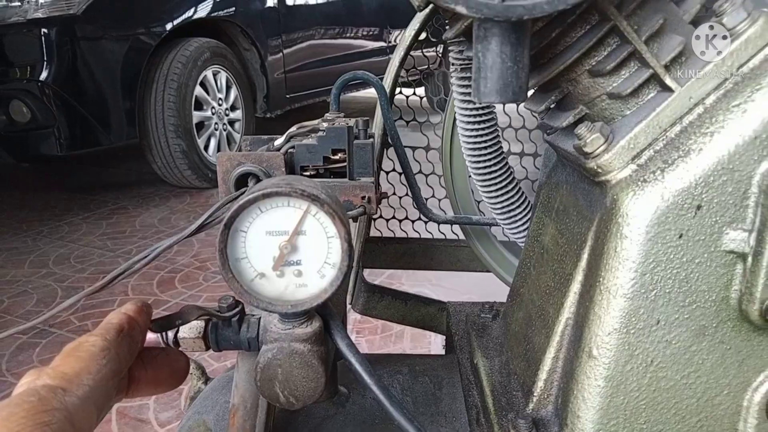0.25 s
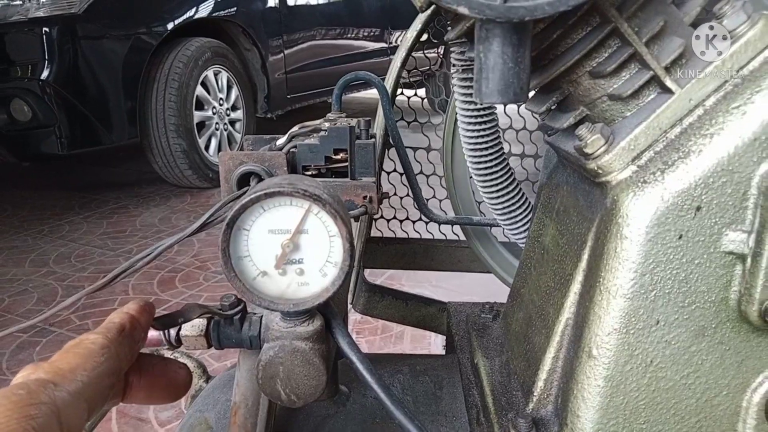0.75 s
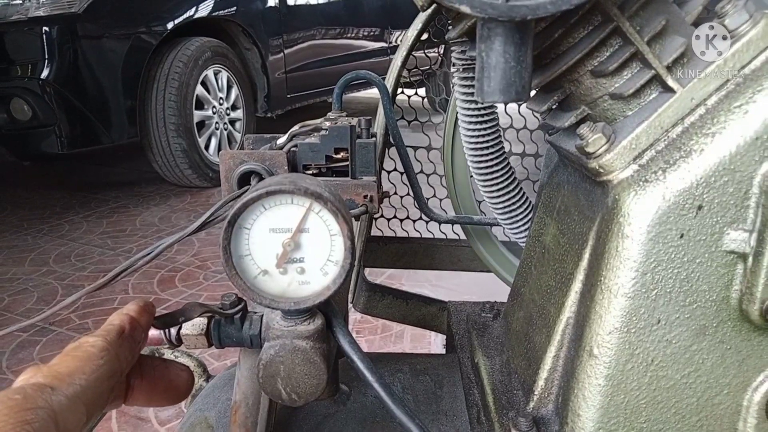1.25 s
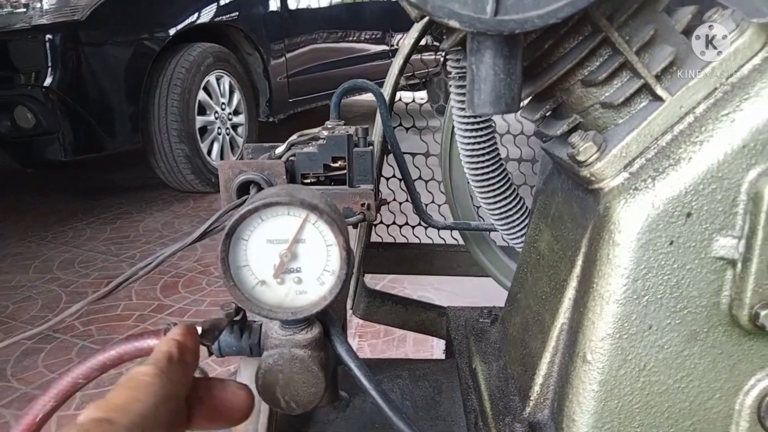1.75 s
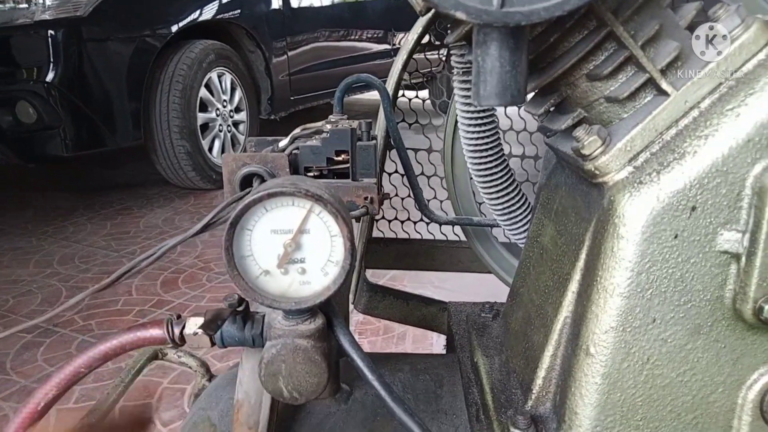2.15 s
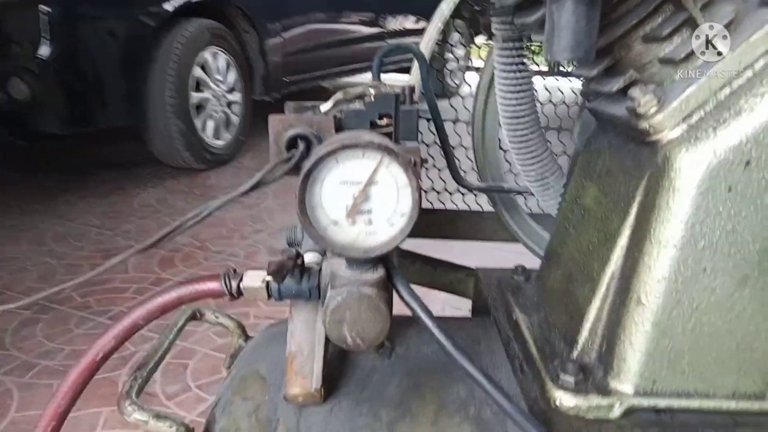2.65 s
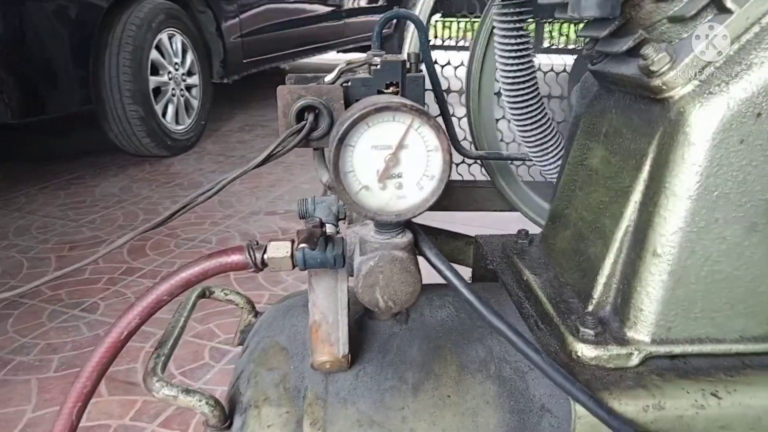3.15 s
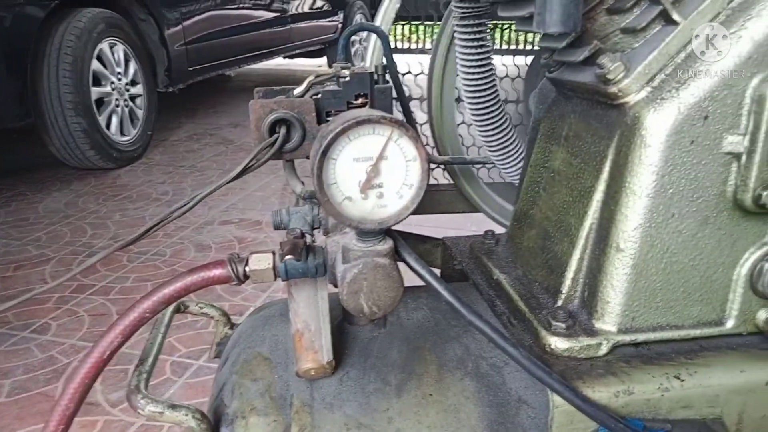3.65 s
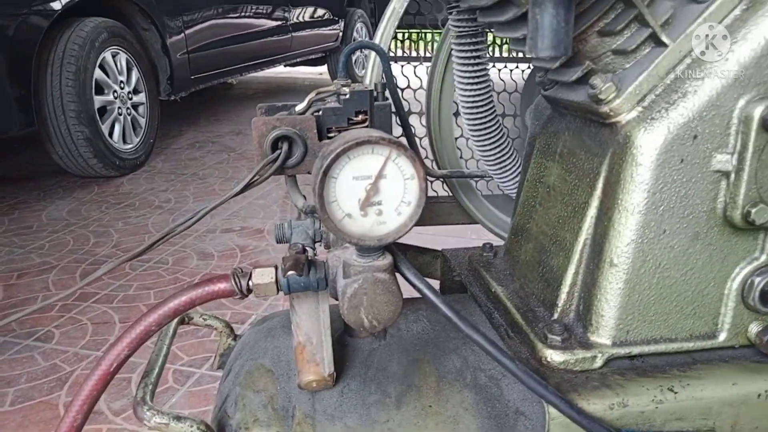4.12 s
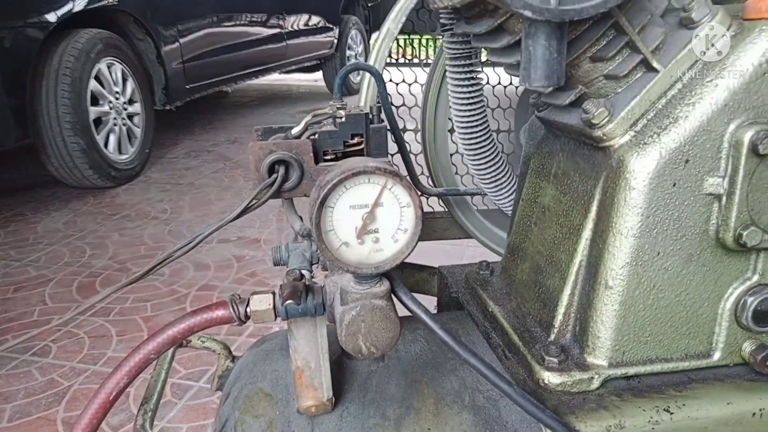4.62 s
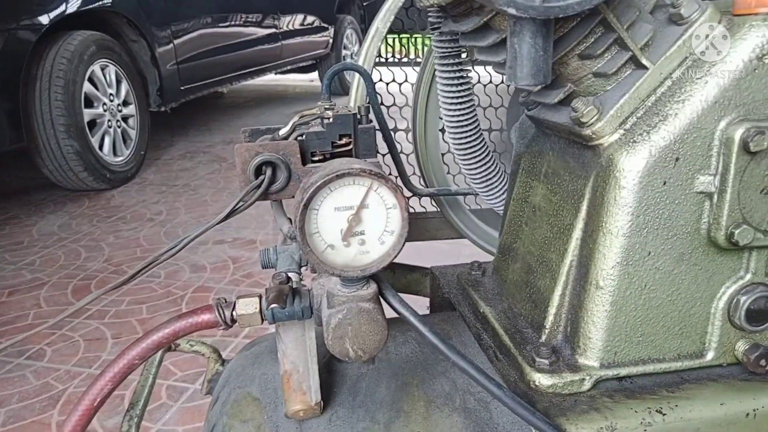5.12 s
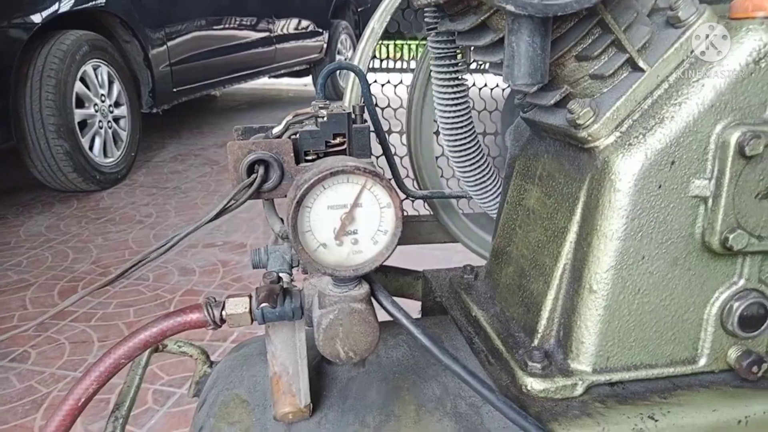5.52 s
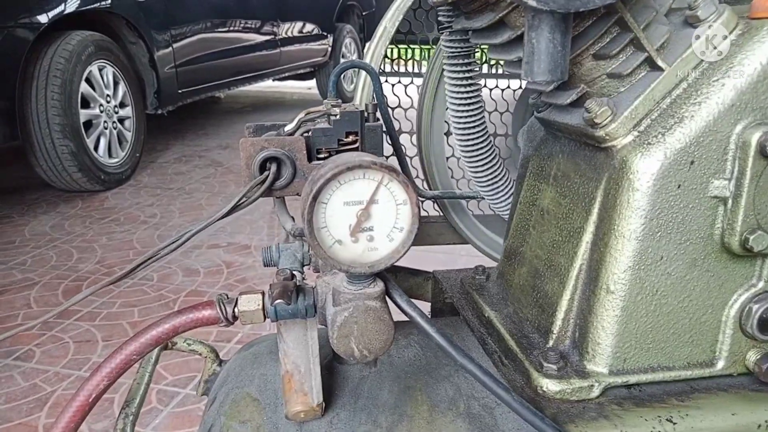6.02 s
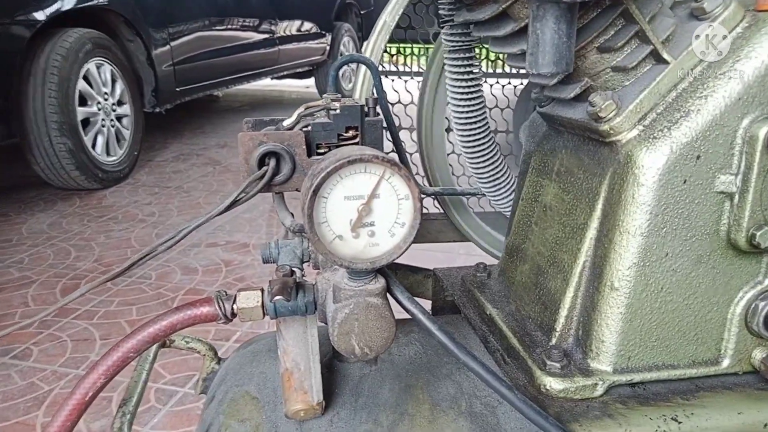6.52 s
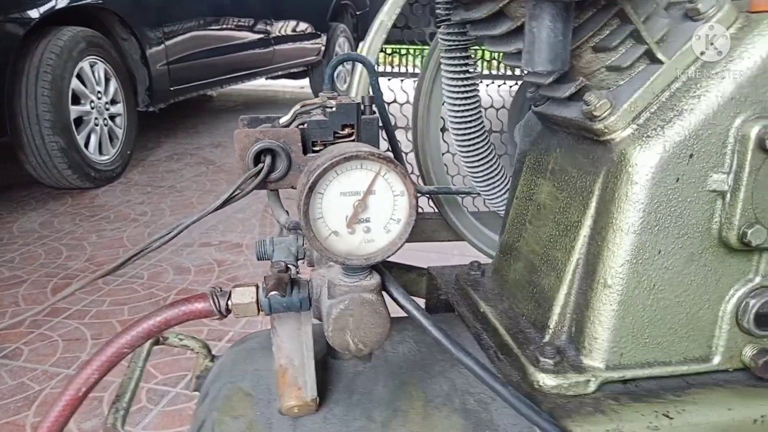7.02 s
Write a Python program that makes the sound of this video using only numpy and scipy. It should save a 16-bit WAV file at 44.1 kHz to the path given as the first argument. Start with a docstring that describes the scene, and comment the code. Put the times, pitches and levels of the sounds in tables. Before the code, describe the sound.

A worn piston compressor runs evenly up close in a hard-floored garage, about six crank turns a second. Each turn gives a low double honk of intake air, clacking metallic valves and rushing air, with irregular high dry squeaks over dense iron clatter and motor hum. Air hisses from an outlet until a tap closes before two seconds; afterwards low wind puffs buffet the microphone.

```python
"""An old belt-driven piston air compressor fills its tank in a garage.
On every crank turn, gulps of air make the intake pipe honk, mainly twice; valve plates ring and air rushes
through the head, made from gliding tones and shaped noise. A dry part squeaks in short gritty glides.
Below run iron clatter (noise and random ticks), steady motor tones and a wavering hum.
The flywheel blows low, lumpy noise at the microphone; an outlet hisses until its tap is shut."""
import sys
import numpy as np
from scipy import signal
from scipy.fft import rfft, irfft, next_fast_len
from scipy.io import wavfile
from scipy.ndimage import uniform_filter1d

SR = 44100
rng = np.random.default_rng(int(sys.argv[2]) if len(sys.argv) > 2 else 0)


def to_wav(s):
    """Save 16-bit WAV."""
    ch = np.atleast_2d(s).T  # columns
    pcm = np.round(np.clip(ch, -1, 1) * 32767)  # PCM
    wavfile.write(sys.argv[1], SR, pcm.astype(np.int16))


N = 320607
TIME = np.arange(N) / SR
HZ = np.fft.rfftfreq(N, 1 / SR)
TURN_S, FIRST_TURN_S = 0.16396, 0.0558  # length of one crank turn, and when the first one begins
TURNS = FIRST_TURN_S + TURN_S * np.arange(-1, 45)

# Gulps of air in the intake pipe on each turn.
# Each row: start in seconds into the turn, level in dB, hold in seconds, release in seconds, starting pitch in Hz.
GULPS = [(.0057, -18.5, .0053, .019, 268.5), (0.0429, -19, 0.0116, 0.0042, 245),
         (0.0552, -18.5, .029, .0035, 263), (0.0962, -29.5, 0.011, 0.01, 253.8)]
GULP_ATTACK_S, GULP_SAG_HZ_PER_S, PIPE_LOWEST_HZ = 0.0059, 940, 212  # each honk sags as the suction eases


def intake(clock, unsteady_cycles=0.023, unsteady_db=0.8, octave_db=-21.0,
           drone_db=-36, drone_hz=238, drone_width_hz=26):
    """Each gulp of air sets the intake pipe honking at a sagging pitch, over a faint steady drone."""
    slip = unsteady_cycles * wander(per_s=65)
    honks = np.zeros(N)
    for s, db, hold_s, release_s, hz in GULPS:
        age, swell = gulp(clock, s, hold_s, release_s)
        # The pitch stops sagging once it reaches the lowest note of the pipe.
        sagging = np.minimum(age, (hz - PIPE_LOWEST_HZ) / GULP_SAG_HZ_PER_S)
        cycles = hz * age - GULP_SAG_HZ_PER_S * sagging * (age - sagging / 2) + slip
        phase = 2 * np.pi * cycles
        honks += gain_of(db) * swell * (np.sin(phase) + gain_of(octave_db) * np.sin(2 * phase))
    drone = coloured(rng.standard_normal(N), resonances([(drone_hz, drone_width_hz, 0)]))
    unsteady = gain_of(unsteady_db * wander(per_s=40))
    return np.sqrt(2) * unsteady * honks + gain_of(drone_db) * drone


def gulp(clock, s, hold_s, release_s):
    """A gulp that comes once a turn: the time since it began, and its attack, hold and release."""
    age = (clock - FIRST_TURN_S - s) % TURN_S
    attack = np.minimum(age / GULP_ATTACK_S, 1)
    return age, attack * np.exp(-np.maximum(age - hold_s, 0) / release_s)


# Resonances of the intake filter housing.
# Each row: pitch in Hz, half width in Hz, relative level in dB.
THROAT = [(326, 215, -7), (535, 35.4, 3), (630, 55, -9)]
# Low push of each valve action.
# Each row: time in seconds into the turn, middle level in dB before the bass cut, half length in seconds.
THUMPS = [(.0115, -23, 0.0013), (0.049, -21, 0.0011), (0.101, -28.5, 0.0019)]


def suction(clock, gasp_db=-34.5, follows=0.45, idle_db=-41, lead_s=0.0062, bass_edge_hz=62):
    """Turbulence in the filter housing swells with each gulp; every valve action gives a low push."""
    flow = gain_of(idle_db)
    for s, db, hold_s, release_s, hz in GULPS:
        age, swell = gulp(clock + lead_s, s, hold_s, release_s)
        flow = flow + gain_of(db) * swell
    gasp = gain_of(gasp_db) * coloured(rng.standard_normal(N) * flow ** follows, resonances(THROAT))
    t = np.arange(-900, 900) / SR
    pushes = np.zeros(N)
    for start in TURNS:
        for s, db, half_s in THUMPS:
            late, loud = rng.uniform(-1, 1, 2)
            push = -t / half_s * np.exp(0.5 - 0.5 * (t / half_s) ** 2)  # one swing up, one swing down
            add(pushes, start + s + 0.0021 * late, gain_of(db + 6.8 * loud) * push)
    bass_cut = signal.butter(3, bass_edge_hz, "high", fs=SR, output="sos")
    return gasp + signal.sosfilt(bass_cut, pushes)


CLACK_AT_S, CLACK_JITTER_S, CLACK_SPREAD_DB = 0.0080, 0.00059, 0.2  # the main valve opens here in every turn
# How hard the main valve opens. Each row: time in seconds, middle level in dB.
CLACK_DB = [(0, -18), (1.4, -16), (3.3, -18), (3.75, -23.5), (4.8, -17.5), (7.27, -18.5)]
# Lesser valve flutters in each turn.
# Each row: time in seconds into the turn, middle pitch in Hz, middle level in dB, half length in seconds.
VALVE = [(.004, 1550, -38, 0.0013), (0.025, 1345, -21.5, .0026), (.128, 1332, -22.5, .0038),
         (.153, 1345, -27.5, .0065)]
# Valve chatter over one turn. Each row: time in seconds into the turn, relative level in dB.
CHATTER = [(0, 9.5), (.025, 3.5), (.05, 8), (.06, -1), (.085, 1.5), (.12, 4), (.127, 7), (.14, 4),
           (.152, 4)]
# Resonances of the valve chest. Each row: pitch in Hz, half width in Hz, relative level in dB.
PLATES = [(1280, 70, -15.5), (1307, 34, 10), (1430, 100, -58), (1560, 310, -2), (1610, 94, 0.5)]


def valves(clock, plate_hz=1346, clack_half_s=0.0062, chatter_db=-29.0, spread_db=1.8):
    """Valve plates flutter as they open and keep chattering in the valve chest."""
    out = np.zeros(N)
    for start in TURNS:
        late, loud, sharp = rng.standard_normal(3)
        swell, phase = flutter(plate_hz * (1 + 0.007 * sharp), clack_half_s, glide=0.0063, rough=0.021)
        db = curve(CLACK_DB, start) + CLACK_SPREAD_DB * loud
        add(out, start + CLACK_AT_S + CLACK_JITTER_S * late, gain_of(db) * swell * np.sin(phase))
        for s, hz, db, half_s in VALVE:
            late, loud, sharp = rng.standard_normal(3)
            swell, phase = flutter(hz * (1 + 0.012 * sharp), half_s, glide=0.003, rough=0.022)
            add(out, start + s + 0.000572 * late, gain_of(db + spread_db * loud) * swell * np.sin(phase))
    rattle = rng.standard_normal(N) * gain_of(each_turn(CHATTER, clock))
    return out + gain_of(chatter_db) * coloured(rattle, resonances(PLATES))


# Air rushing through the head over one turn. Each row: time in seconds into the turn, relative level in dB.
FLOW = [(0, -15), (.014, 2), (.04, 1), (.058, 6.5), (.078, 1), (.09, 6.5), (.108, 1), (.135, 2), (.16, 4)]
# Resonances of the air passages. Each row: pitch in Hz, half width in Hz, relative level in dB.
HEAD = [(829.4, 17, 5), (872.6, 37.4, 4), (920, 65, -6.5)]


def head(clock, rush_db=-28.5):
    """Air surges through the passages of the cylinder head, which colour its noise."""
    surges = rng.standard_normal(N) * gain_of(each_turn(FLOW, clock))
    return gain_of(rush_db) * coloured(surges, resonances(HEAD))


# The loud squeaks, when the dry part grips hard.
# Each row: time in seconds, pitch in Hz, level in dB, octave level in dB, half length in seconds,
# glide below (and before that above) the pitch as a share of it.
SQUEAKS = [(0.187, 2850, -16, -34, .0065, .005), (0.677, 3530, -21.5, -29.5, 0.0074, .045),
           (.846, 3440, -19, -31, 0.004, 0.017), (1.18, 3700, -16, -20.5, 0.0044, 0.0089),
           (1.339, 3540, -23, -31, 0.007, 0.022), (1.493, 3900, -23.5, -33, 0.003, .04),
           (1.705, 3540, -25.5, -45, 0.0043, 0.033), (1.988, 3850, -27, -23, 0.0029, 0.049),
           (2.198, 3470, -15.5, -30.5, .0053, -0.011), (2.485, 2890, -15.5, -31, 0.0058, 0.027),
           (2.64, 3600, -23.5, -45, 0.0032, .03), (2.973, 3580, -23.5, -25.5, .0054, 0.095),
           (3.142, 3430, -20.5, -33, 0.0084, 0.0086), (3.474, 3660, -18, -23, 0.0047, -0.04),
           (3.637, 3440, -19, -28.5, 0.0038, 0.026), (3.792, 3780, -21, -36.5, 0.0025, .03),
           (4.494, 3488, -19, -33, 0.0046, 0.048), (4.785, 3040, -23.5, -41, 0.0065, .07),
           (4.937, 3510, -22, -45, 0.0032, .02), (5.27, 3600, -21.5, -25.5, 0.0062, .11),
           (5.434, 3400, -19.5, -31.5, 0.0038, 0.023), (5.772, 3566, -21, -26, 0.0066, .005),
           (5.934, 3410, -24.5, -36, 0.0085, 0.027), (6.294, 3530, -24, -45, 0.0028, 0.028),
           (6.789, 3450, -21, -36.5, .0023, 0.014)]
# The faint chirp of a turn: seconds into the turn, then middle values for pitch, levels and half length.
SLIP_AT_S, SLIP_HZ, SLIP_DB, SLIP_OCTAVE_DB, SLIP_HALF_S = 0.131, 3914, -31, -41, 0.0027


def squeaks(pitch_spread=0.049, spread_db=7.5, jitter_s=0.0033):
    """The dry part squeaks loudly on some turns and chirps faintly where no loud squeak is close."""
    out = np.zeros(N)
    for s, *shape in SQUEAKS:
        add(out, s, squeak(*shape))
    for s in TURNS + SLIP_AT_S:
        late, loud, bright, sharp = rng.uniform(-1, 1, 4)
        chirp = squeak(SLIP_HZ * (1 + pitch_spread * sharp), SLIP_DB + spread_db * loud,
                       SLIP_OCTAVE_DB + spread_db * bright, SLIP_HALF_S, fall=0.0378)
        if all(abs(row[0] - s) > TURN_S / 10 for row in SQUEAKS):
            add(out, s + jitter_s * late, chirp)
    return out


def squeak(hz, db, octave_db, half_s, fall, third_db=-18, fourth_db=-27):
    """Dry metal sticks and slips: a short gritty glide with overtones."""
    swell, phase = flutter(hz, half_s, glide=fall, rough=0.017)
    grit = gain_of(0.76 * evened(uniform_filter1d(rng.standard_normal(len(swell)), size=40)))
    overtones = np.sin(2 * phase)
    overtones += gain_of(third_db) * np.sin(3 * phase)  # third and fourth are relative to the octave
    overtones += gain_of(fourth_db) * np.sin(4 * phase)
    return swell * grit * (gain_of(db) * np.sin(phase) + gain_of(octave_db) * overtones)


# Piston and valve scrapes in each turn.
# Each row: time in seconds into the turn, middle pitch in Hz, middle level in dB, half length in seconds.
SCRAPES = [(.011, 3560, -39, .003), (.053, 3950, -36.5, 0.0047), (0.141, 4000, -44, .003)]


def scrapes(octave_db=-3, spread_db=7):
    """Faint scrapes on each turn, too uneven to hold a pitch."""
    out = np.zeros(N)
    for start in TURNS:
        for s, hz, db, half_s in SCRAPES:
            late, loud, sharp = rng.uniform(-1, 1, 3)
            swell, phase = flutter(hz * (1 + 0.0399 * sharp), half_s, glide=0.0203, rough=0.038)
            stray = uniform_filter1d(0.15 * rng.standard_normal(len(phase)), size=24)
            phase = phase + np.cumsum(stray)
            tone = np.sin(phase) + gain_of(octave_db) * np.sin(2 * phase)
            add(out, start + s + 0.002 * late, gain_of(db + spread_db * loud) * swell * tone)
    return out


def ringing(x, hz=3450, width_hz=300, t60=0.16):
    """The iron picks up a squeak through one resonance, used twice, and rings on as dying reflections."""
    b, a = signal.iirpeak(hz, hz / width_hz, fs=SR)
    picked_up = signal.lfilter(b, a, signal.lfilter(b, a, x))
    return garage(picked_up, t60)


# Broad sound of the running iron. Each row: frequency in Hz, relative level in dB per Hz.
IRON = [(40, -38), (200, 9), (340, -3.5), (440, -8.5), (700, -2), (1120, -4.5), (1850, -6), (2400, 2.5),
        (3450, -5.5), (4000, -13.5), (4900, -10.5), (6400, -21), (7200, -18), (8400, -14), (10500, -29.5),
        (12500, -36), (13800, -29), (15500, -29)]
# Resonances and dips of the casting, tank and guard. Each row: pitch in Hz, full width in Hz, lift in dB.
CASTING = [(545, 133, 8), (1026, 58, 4.5), (1810, 190, -3.5), (1653, 32, 14), (1700, 28, -3.5),
           (1983, 96, 6.5), (2187, 98, 10), (2346, 50, 3), (2708, 31, 9), (2820, 76, 2.5), (3010, 94, -2.5),
           (3130, 36, 8), (3240, 24, 6.5), (3384, 130, 6), (4170, 400, 4.5), (4427, 89, 11.5),
           (4696, 130, 9), (4960, 100, 5), (5220, 40, 8.5), (9520, 160, 6)]
# The microphone draws back from the cylinder head. Each row: time in seconds, closeness from 0 to 1.
BESIDE_HEAD = [(2.5, 1), (3.0, 0.18)]
# Cooling fins, heard mostly from close by. Each row: pitch in Hz, half width in Hz, relative level in dB.
FINS = [(1546, 49, 8), (2570, 57, -23), (2820, 23, -9), (3200, 51, 3), (3780, 10, -25), (4770, 54, -6.5)]


def iron(clatter_db=-25.5, ticks_per_s=2500, tick_db=-4, ripple_db=1.0, fins_db=-32):
    """A dense rattle of small impacts and fan noise sounds through the casting and its cooling fins."""
    ticks = (rng.random(N) < ticks_per_s / SR) * rng.uniform(-0.9, 1, N)
    drive = rng.standard_normal(N) + gain_of(tick_db) * evened(ticks)
    # Countless small modes make the treble spectrum uneven.
    crowded = np.interp(HZ, np.arange(400) * 70, rng.standard_normal(400)) * (HZ > 5300)
    casting = coloured(drive, gain_of(read(IRON) + lift(CASTING) + ripple_db * crowded))
    fins = curve(BESIDE_HEAD, TIME) * coloured(rng.standard_normal(N), resonances(FINS))
    return gain_of(clatter_db + 0.89 * wander(per_s=180)) * casting + gain_of(fins_db) * fins


# Tones of the motor and its fan.
# Each row: pitch in Hz, middle level in dB, share of the crank's speed swing that the tone follows.
WHINE = [(359.7, -48, 0), (737.8, -52, .4), (883.9, -44, .5), (1015.8, -40, 1), (1135.5, -54, .5)]


def motor(swing=0.0037):
    """Most motor tones sag, mainly twice a turn, as the pistons load the belt."""
    angle = 2 * np.pi * TIME / TURN_S
    speed = swing * (2 * np.sin(angle) + 5 * np.sin(2 * angle + 1))
    out = np.zeros(N)
    for hz, db, follows in WHINE:
        pitch = hz * (1 + follows * speed + 0.00055 * wander(per_s=4.59))
        tone = np.sqrt(2) * np.sin(2 * np.pi * np.cumsum(pitch) / SR)
        out += gain_of(db + 2 * wander(per_s=3.13)) * tone
    return out


# A hum that swells and fades. Each row: time in seconds, middle level in dB.
HUM_DB = [(0, -43), (1.1, -41), (1.5, -46), (3.1, -41.5), (5.15, -46.5), (5.35, -34), (5.6, -43),
          (7.27, -48.5)]


def hum(hz=393.7, swell_db=2.5):
    """A tone of wavering pitch and level comes and goes under the clatter."""
    pitch = hz * (1 + 0.00303 * wander(per_s=10))
    level_db = curve(HUM_DB, TIME) + swell_db * wander(per_s=6)
    return gain_of(level_db) * np.sqrt(2) * np.sin(2 * np.pi * np.cumsum(pitch) / SR)


# Strength of the flywheel draught. Each row: time in seconds, middle level in dB.
DRAUGHT_DB = [(0, -28.5), (.5, -30.5), (1.2, -38.5), (2.7, -35), (3.05, -31), (4.1, -31), (4.9, -34),
              (6.2, -31), (7.27, -32.5)]
# Strong puffs on the microphone. Each row: time of the peak in seconds, level in dB, half length in seconds.
PUFFS = [(3.047, -16, 0.026), (3.273, -15, 0.0084), (3.926, -18, .007), (4.26, -21, 0.037),
         (5.134, -18, 0.01), (5.768, -16.5, 0.0092), (6.389, -16.5, 0.011), (6.88, -16.5, .018)]
# Spectrum of the draught. Each row: frequency in Hz, relative level in dB per Hz.
DRAUGHT = [(20, -45), (35, -57), (55, -10), (75, 1.5), (110, 4.5), (170, -1), (230, -10.5), (400, -15.5),
           (900, -52)]


def draught(lumps_db=4.0, gusts_db=2.5):
    """The spoked flywheel blows lumpy air across the microphone: low noise of uneven level."""
    unevenness_db = lumps_db * wander(per_s=29) + gusts_db * wander(per_s=6)
    level = gain_of(curve(DRAUGHT_DB, TIME) + unevenness_db)
    for s, db, half_s in PUFFS:
        level = np.maximum(level, gain_of(db) * np.exp(-0.5 * ((TIME - s) / half_s) ** 2))
    return level * coloured(rng.standard_normal(N), gain_of(read(DRAUGHT)))


# The tap closes. Each row: time in seconds, level in dB.
LEAK_DB = [(0, -30.5), (1.2, -32.5), (1.55, -32.5), (1.68, -37), (1.82, -55), (2.0, -86)]
# Spectrum of the hiss. Each row: frequency in Hz, relative level in dB per Hz.
LEAK = [(1500, -19), (3000, 5.5), (4700, -7), (6400, -10.5), (7600, -11.5), (8150, 5.5), (8900, -5.5),
        (9800, -9.5), (11500, -10), (12200, -9), (13400, -7), (14300, -5), (15500, -19.5)]
# Resonances and a dip of the outlet. Each row: pitch in Hz, full width in Hz, lift in dB.
WHISTLES = [(7660, 150, 13), (12150, 500, -4), (13400, 600, 4.5), (15400, 400, 16)]


def leak():
    """Air escapes at the outlet as hissing noise until the tap is shut."""
    hiss = coloured(rng.standard_normal(N), gain_of(read(LEAK) + lift(WHISTLES)))
    return gain_of(curve(LEAK_DB, TIME)) * hiss


def garage(x, t60=0.17):
    """Sparse reflections from floor, car and walls die away by 60 dB in t60 seconds."""
    t = np.arange(SR // 2) / SR
    sparse = rng.standard_normal(len(t)) * (rng.random(len(t)) < 2000 / SR)
    taps = sparse * (t > 0.005) * np.exp(-np.log(1000) * t / t60)
    return signal.fftconvolve(x, taps / np.linalg.norm(taps))[:N]


def flutter(hz, half_s, glide, rough):
    """A self-excited vibration that catches quickly and dies: its envelope and its unsteady phase."""
    t = np.arange(-1500, 1500) / SR
    shake = uniform_filter1d(rng.standard_normal(len(t)), size=140)
    shake = evened(uniform_filter1d(shake, size=30))
    age = np.clip(t / half_s, -20, 20)
    pitch = hz * (1 - glide * np.tanh(age / 2) + rough * shake)
    swell = 1 / np.sqrt(1 + np.exp(-7 * (age + 0.76))) / np.sqrt(1 + np.exp(3 * (age - 0.8)))
    return np.sqrt(2) * swell, 2 * np.pi * (np.cumsum(pitch) / SR + rng.random())


def gain_of(db):
    """Decibels to amplitude."""
    return 10 ** (np.asarray(db) / 20)


def evened(x):
    """Scales to rms 1."""
    return x / np.sqrt(np.mean(x ** 2) + 1e-20)


def curve(table, at):
    """Reads a table of points as a curve of straight lines."""
    return np.interp(at, *np.transpose(table))


def each_turn(table, clock):
    """Repeats a curve once a crank turn."""
    return np.interp((clock - FIRST_TURN_S) % TURN_S, *np.transpose(table), period=TURN_S)


def wander(per_s):
    """Random drift of rms 1, with per_s new points a second joined by straight lines."""
    return evened(np.interp(TIME * per_s, np.arange(4096), rng.standard_normal(4096)))


def read(points):
    """A spectrum in dB, joined on a log-frequency axis."""
    f, db = np.transpose(points)
    return np.interp(np.log(HZ + 1), np.log(f), db)


def lift(modes):
    """Bell-shaped bumps and dips on a spectrum, in dB."""
    return sum(db * np.exp(-np.log(2) * (2 * (HZ - hz) / width) ** 2) for hz, width, db in modes)


def resonances(modes):
    """Gain of a set of steep-sided resonances, added as powers."""
    return np.sqrt(sum((gain_of(db) / (1 + ((HZ - hz) / width) ** 2)) ** 2 for hz, width, db in modes))


def coloured(x, gain):
    """Filters x by a gain at each frequency, then scales it to rms 1."""
    size = next_fast_len(N)
    bin_gain = np.interp(np.fft.rfftfreq(size, 1 / SR), HZ, gain)
    return evened(irfft(rfft(x, size) * bin_gain, size)[:N])


def add(mix, s, sound):
    """Mixes in a sound centred on time s."""
    start = round(s * SR) - len(sound) // 2
    part, sound = mix[max(start, 0):], sound[max(-start, 0):]
    count = min(len(part), len(sound))
    part[:count] += sound[:count]


# Loudness of the pump: a slight drop as the microphone draws back, then the level dips at the very end. Each
# row: time in seconds, gain in dB.
NEAR = [(0, 0), (2.55, 0), (2.95, -0.7), (7.19, -0.5), (7.27, -8)]


def scene(squeak_room_db=-8, valve_room_db=-9, ring_db=-8):
    """The pump's pulsing air and valves share one slightly unsteady crank; the other sounds join them."""
    clock = TIME + 0.00058 * wander(per_s=8)
    near = gain_of(curve(NEAR, TIME))
    squeal = squeaks() + scrapes()
    plates = valves(clock)
    pump = near * (intake(clock) + suction(clock) + plates + head(clock) + iron() + motor())
    echoes = garage(gain_of(squeak_room_db) * squeal + gain_of(valve_room_db) * plates)
    ring = gain_of(ring_db) * ringing(squeal)
    return (pump + squeal + ring + echoes + hum() + draught() + leak())[None]


def record(dry, edge_hz=15600):
    """A steep filter removes the treble above edge_hz."""
    low_pass = signal.firwin(511, edge_hz, window=("kaiser", 9), fs=SR)
    return signal.oaconvolve(dry, low_pass[None], "same")


dry = scene()
out = record(dry)
to_wav(out)
```